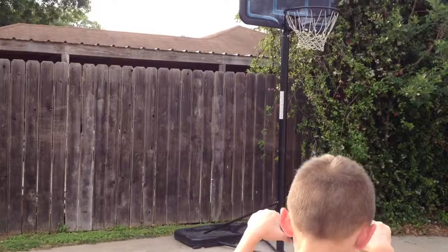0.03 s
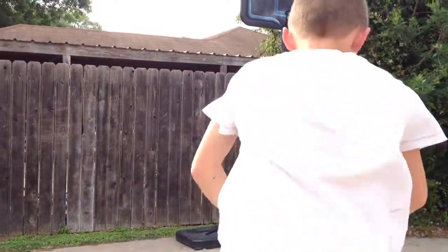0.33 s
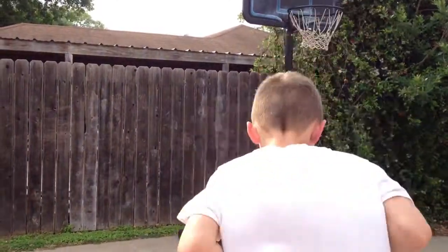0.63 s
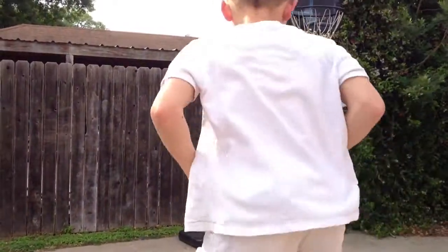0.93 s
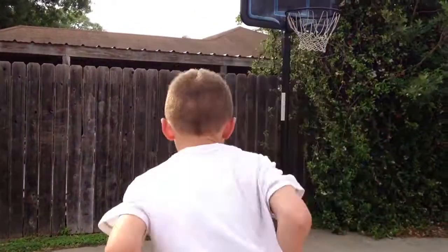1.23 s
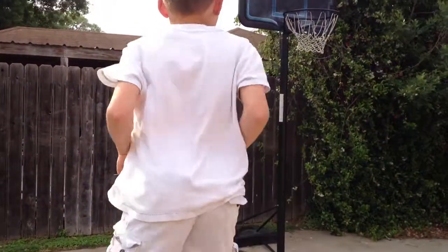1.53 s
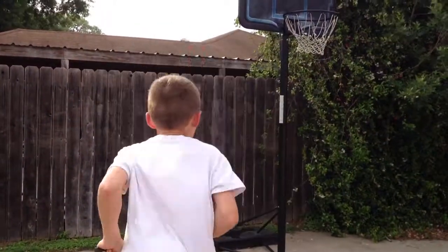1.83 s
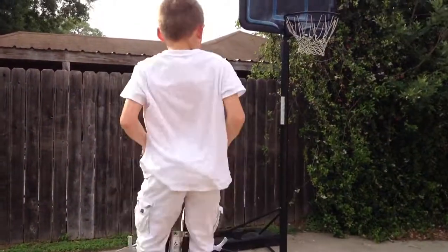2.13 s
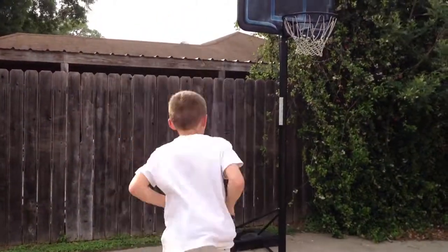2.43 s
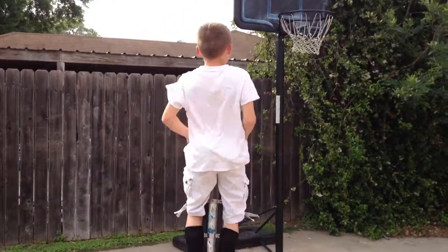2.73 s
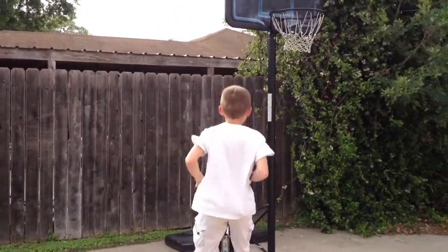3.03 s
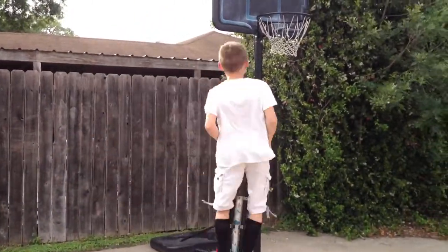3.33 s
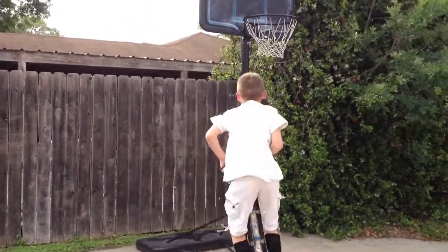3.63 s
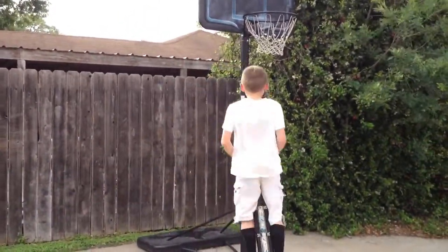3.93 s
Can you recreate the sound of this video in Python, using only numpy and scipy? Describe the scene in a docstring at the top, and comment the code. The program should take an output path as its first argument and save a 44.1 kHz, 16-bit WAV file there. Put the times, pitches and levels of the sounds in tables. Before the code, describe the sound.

Six pogo stick bounces, each a rattling landing and a sharp metallic clack, in a quiet yard.

```python
"""Pogo stick on a concrete drive

A child bounces away towards a wooden fence. At each landing the rubber foot thumps and spring and pegs
clatter; the shaft then slides out with friction and clacks against its stop at take-off. Hard impacts
excite the modes of the steel tube. The fence returns one echo and the yard a diffuse tail, while faint
outdoor air and a small bird lie behind."""
import sys
import numpy as np
from scipy import signal
from scipy.fft import rfft, irfft
from scipy.io import wavfile

SR = 44100
rng = np.random.default_rng(int(sys.argv[2]) if len(sys.argv) > 2 else 0)


def materialize(psi):
    """Save the field psi as 16-bit PCM at rate SR to the path in sys.argv[1].

    A 1-D psi becomes a single channel; in a 2-D psi each row is a channel.
    """
    bounded = np.clip(np.atleast_2d(psi).T, -1, 1)
    quanta = np.round(bounded * 32767).astype(np.int16)
    wavfile.write(sys.argv[1], SR, quanta)


N = 176400
TIME = np.arange(N) / SR
AGE = TIME[:SR // 3]  # seconds within one event

# Spectral envelopes of the noisy sources: frequency_hz, relative_density_db
AIR_SPECTRUM = [(25, -16), (60, -18), (110, -3.5), (160, 6), (210, 7.5), (350, 0), (600, -2.5),
                (1200, -1.5), (2200, -7.5), (4200, -6), (5300, -15.5), (7500, -9.5), (10500, -23),
                (15000, -29)]
SLIDE_SPECTRUM = [(200, -47), (1000, -7.5), (2400, -2.5), (3500, -1), (4500, 2), (5300, -11.5),
                  (7000, -3.5), (8700, -4.5), (10000, -15.5), (15000, -22.5)]
KNOCK_SPECTRUM = [(25, -65), (80, -58), (200, -17), (450, -6.5), (1000, -2), (2000, 1), (3200, 3.5),
                  (4500, 1), (5300, -5), (6800, 1), (8400, -6), (10000, -18), (15000, -30.5)]
THUMP_SPECTRUM = [(30, -22), (90, -25), (125, -13), (155, -4.5), (180, -7.5), (215, 2.5), (290, -9),
                  (400, -23), (900, -34.5), (3000, -23)]
RATTLE_SPECTRUM = [(60, -35), (200, -10), (450, -9.5), (1000, 3), (2000, 1.5), (3200, 4.5), (4500, 2),
                   (5300, -4.5), (6800, 0.5), (8500, -3), (10000, -20.5), (15000, -24)]
STOP_SPECTRUM = [(25, -40), (80, -43), (200, -4.5), (500, -9), (800, -5.5), (1400, -1.5), (2300, 2),
                 (3300, 0.5), (4700, 0), (5300, -6.5), (6600, -2.5), (8500, -5.5), (9600, -16),
                 (15000, -30.5)]
BASS_SHELF_HZ, TREBLE_SHELF_HZ, RESONANCE_HALF_WIDTH_HZ = 1300, 5200, 120

# Outdoor air: time_s, level_db
AIR_LEVELS = [(0, -51), (.55, -52.5), (.9, -50), (1.15, -58.5), (1.7, -52), (2.3, -55.5), (2.9, -54.5),
              (3.6, -54), (4, -50.5)]
# Bird chirps: start_s, length_s, start_hz, end_hz, level_db, rasp_hz
CHIRPS = [(2.945, 0.104, 4350, 4000, -51.5, 380), (3.227, .064, 3650, 3230, -44, 25),
          (3.793, 0.047, 3130, 2810, -44, 100)]

# Delay of the fence echo, shorter near the fence: time_s, delay_s
FENCE_DELAYS = [(.86, .028), (1.44, 0.034), (2.03, 0.029), (2.64, 0.019), (3.29, .018), (3.95, 0.02)]
# Reverberation of the yard: frequency_hz, level_db, t60_s
YARD_BANDS = [(147, -9.5, 0.66), (494, -3.5, 0.34), (1430, -9.5, 0.47), (4000, -7.5, .39), (7650, -6, 0.29),
              (14000, -3.5, 0.25)]
# Reverberant gain, tending to rise with distance: time_s, gain_db
YARD_GAINS = [(.6, -3), (1.5, 0.5), (2.1, -0.5), (2.7, 1.5), (4, 3)]
FENCE_DB, YARD_BUILD_S, YARD_GRAIN_DB, YARD_GRAIN_HZ = -15, 0.0047, 2.5, 390

# Modes of the steel tube: pitch_hz, level_db, t60_s
TUBE_MODES = [(1620, -45, .18), (2902, -44, .2), (3397, -44, .2), (4470, -31, .38), (7122, -46, .15),
              (8560, -42, .14)]
# The shaft slides out: peak_s, level_db, treble_db, squeak_db
SLIDES = [(.77, -46, -2.5, 12), (1.40, -46, -0.5, -13), (1.991, -47.5, 1.5, 9), (2.59, -51, 2, 2),
          (3.239, -49, 0.5, -7), (3.92, -45.5, -1.5, -15)]
SLIDE_WIDTH_S, SLIDE_ROUGH_DB, SLIDE_SQUEAK_HZ = 0.05, 2.5, 3680

# Loose parts strike the frame: start_s, level_db, treble_db, clunk_db
KNOCKS = [(.015, -38.5, -11, -29), (0.129, -43, 10, 0), (.214, -33.5, -9, 4), (0.508, -35.5, -1, 13.5),
          (.578, -32.5, -8, -4), (.5877, -11.5, 8, -31), (0.5901, -13, 4, -3), (0.6052, -21.5, 5, -10),
          (0.6353, -23.5, -5, 7), (1.196, -27, 4, 5), (1.203, -19, -6, 0), (1.2143, -15.5, 2.5, -9),
          (1.224, -24.5, 0, 0), (1.2337, -32, 18, 3), (1.4789, -21, 9, -12), (1.7910, -11.5, 0, 4),
          (1.7995, -16.5, 1, 7), (1.8073, -9.5, 4, -10), (1.8110, -8.5, -2, -2), (1.8352, -19, 18, 6),
          (2.0585, -15.5, 11.5, 14), (2.4033, -9, 2, 6), (2.4129, -9, 13, -2), (2.4214, -9.5, 10.5, -10),
          (2.4334, -43, 10, 3), (2.451, -18, 0, 11), (3.0414, -16.5, 5.5, 11), (3.046, -20, 5, 0),
          (3.0522, -18, 13, 14), (3.0582, -8.5, 7.5, 11.5), (3.7167, -32, -3, 17)]
KNOCK_CRACK_DB, KNOCK_TUBE_DB, CLUNK_HZ = -3.5, -19, 956

# The foot lands: start_s, thump_db, rattle_db, rattle_treble_db
LANDINGS = [(.584, -50, -32, 0.5), (1.193, -34, -34, -6), (1.788, -30.5, -27, 3), (2.401, -34, -27.5, -2.5),
            (3.039, -34, -33, -11), (3.713, -30.5, -29.5, -2.5)]
RATTLE_CLICKS_PER_S, RATTLE_SPREAD_DB = 1800, 3

# The shaft hits its stop: start_s, level_db, bass_db, treble_db, low_resonance_hz, low_lift_db,
# high_resonance_hz, high_lift_db, rebound_db, tube_db
STOP_IMPACTS = [(0.8573, -7, -1.5, -4.5, 2050, 7.5, 3240, 5.5, -32, -1),
                (1.4443, -11.5, 3, 0, 840, 4, 3340, 8, -3.5, -2),
                (2.0347, -8, 1.5, -0.5, 1750, 9.5, 4400, 7, -19, -17),
                (2.6409, -10.5, 4, 2, 1400, 11, 2440, 3, -8, -6),
                (3.2910, -11.5, 5, 3, 1845, 11, 3160, 1, -6.5, -11),
                (3.9495, -8.5, 1, 3, 1130, 5, 2340, 8, -7.5, 10)]
# Broad resonances common to every stop impact: centre_hz, lift_db
STOP_RESONANCES = [(1020, 3.5), (1700, 3), (2850, 3.5), (3700, 3.5), (4470, 5.5), (7200, 4), (8450, 3.5)]
STOP_CLACK_DB, STOP_TUBE_DB, REBOUND_S = -2.5, 3.5, 0.0074
SCATTERED_LIFT_SHARE = 0.51  # part of each resonance's dB lift left in sound sent round the yard


def from_db(db):
    """Amplitude ratio of a level in decibels."""
    return 10 ** (np.asarray(db) / 20)


def unit_power(x):
    """Normalisation to a mean square of one."""
    return x / np.sqrt(np.mean(x ** 2) + 1e-20)


def at_hz(table, hz, column=1):
    """Interpolation on a logarithmic frequency axis."""
    table = np.array(table)
    return np.interp(np.log(hz + 1), np.log(table[:, 0]), table[:, column])


def add(out, start_s, x):
    """Superposition of a sound from a given time."""
    i = max(int(start_s * SR), 0)
    out[i:i + len(x)] += x[:max(N - i, 0)]


def white_noise():
    """Gaussian noise with a flat spectrum, one event long."""
    return rng.standard_normal(len(AGE))


def drift(corner_hz):
    """Random fluctuation of unit power: noise through a two-pole low-pass."""
    pole = np.exp(-2 * np.pi * corner_hz / SR)
    smooth = signal.lfilter([1], [1, -2 * pole, pole * pole], rng.standard_normal(N + SR))
    return unit_power(smooth[SR:])


def coloured(x, spectrum, bass_db=0, treble_db=0, resonances=()):
    """Minimum-phase filter of unit power gain: a spectral envelope, two shelves and resonance peaks."""
    size = len(x)
    hz = np.arange(size // 2 + 1) * SR / size
    db = at_hz(spectrum, hz) + bass_db / (1 + (hz / BASS_SHELF_HZ) ** 4)
    db += treble_db * (1 - 1 / (1 + (hz / TREBLE_SHELF_HZ) ** 8))
    for centre_hz, lift_db in resonances:
        db += lift_db / (1 + ((hz - centre_hz) / RESONANCE_HALF_WIDTH_HZ) ** 2)
    cepstrum = irfft(np.log(unit_power(from_db(db))), size)
    cepstrum[1:size // 2] *= 2  # folding the cepstrum makes the filter causal
    cepstrum[size // 2 + 1:] = 0
    return irfft(rfft(x) * np.exp(rfft(cepstrum)), size)


def burst(noise, hold_s, t60_s, whitening=0.4):
    """Impact excitation: partly whitened noise that holds, then decays; its envelope sets its energy."""
    envelope = from_db(-60 * np.maximum(AGE - hold_s, 0) / t60_s)
    spectrum = rfft(noise * envelope)
    whitened = irfft(spectrum / (abs(spectrum) + 1e-9) ** whitening, len(AGE))
    return unit_power(whitened * (AGE < hold_s + t60_s)) * np.sqrt(np.mean(envelope ** 2))


def outdoor_air():
    """Ambient noise: distant rumble and leaf hiss form a broad spectrum of slowly varying level."""
    level_db = np.interp(TIME, *np.transpose(AIR_LEVELS)) + 0.27 * drift(corner_hz=3.1)
    return from_db(level_db) * coloured(rng.standard_normal(N), AIR_SPECTRUM)


def bird():
    """Frequency modulation: thin whistles glide downward, and random pitch deviation adds rasp."""
    out = np.zeros(N)
    for start_s, length_s, start_hz, end_hz, level_db, rasp_hz in CHIRPS:
        size = int(length_s * SR)
        pitch_hz = np.linspace(start_hz, end_hz, size) + rasp_hz * drift(corner_hz=190)[:size]
        envelope = from_db(level_db) * np.sin(np.linspace(0, np.pi, size))
        add(out, start_s, envelope * np.sin(2 * np.pi * np.cumsum(pitch_hz) / SR))
    return out


def fence_echo(x):
    """Specular reflection: one weaker copy, delayed by its extra path as the child moves."""
    delay_s = np.interp(TIME, *np.transpose(FENCE_DELAYS))
    return from_db(FENCE_DB) * np.interp(TIME - delay_s, TIME, x)


def yard_reverberation(x):
    """Diffuse scattering: many echoes merge into a grainy tail, each band decaying at its own rate."""
    age, tail = TIME[:SR], 0
    grain = from_db(YARD_GRAIN_DB * drift(YARD_GRAIN_HZ)[:SR])
    build_up = 1 - np.exp(-age / YARD_BUILD_S)
    edges_hz = np.geomspace(60, 17000, 13)
    for low_hz, high_hz in zip(edges_hz, edges_hz[1:]):
        centre_hz = np.sqrt(low_hz * high_hz)
        band_pass = signal.butter(2, [low_hz, high_hz], "band", fs=SR, output="sos")
        band = signal.sosfilt(band_pass, grain * rng.standard_normal(SR))
        decay = from_db(-60 * age / at_hz(YARD_BANDS, centre_hz, column=2))
        gain = from_db(at_hz(YARD_BANDS, centre_hz)) * np.sqrt(2 * (high_hz - low_hz)) / SR
        tail += gain * unit_power(band * decay * build_up)
    distance_gain = from_db(np.interp(TIME, *np.transpose(YARD_GAINS)))
    return signal.fftconvolve(x * distance_gain, tail)[:N]


def tube_ring():
    """Free vibration: a blow excites the tube's damped modes with random strengths and phases."""
    ring = np.zeros(len(AGE))
    for pitch_hz, level_db, t60_s in TUBE_MODES:
        envelope = rng.uniform(0.75, 1) * from_db(level_db - 60 * AGE / t60_s)
        ring += envelope * np.sin(2 * np.pi * (pitch_hz * AGE + rng.random()))
    return ring


def shaft_slides():
    """Sliding friction: the spring pushes the shaft through its bushing, and a rough hiss swells."""
    out, middle_s = np.zeros(N), AGE.mean()
    swell = np.exp(-0.5 * ((AGE - middle_s) / SLIDE_WIDTH_S) ** 2)
    for peak_s, level_db, treble_db, squeak_db in SLIDES:
        friction = white_noise() * from_db(SLIDE_ROUGH_DB * drift(corner_hz=95)[:len(AGE)])
        squeak = [(SLIDE_SQUEAK_HZ, squeak_db)]
        rub = coloured(unit_power(friction), SLIDE_SPECTRUM, treble_db=treble_db, resonances=squeak)
        add(out, peak_s - middle_s, from_db(level_db) * swell * rub)
    return out


def frame_knocks():
    """Brief contact gives a wide spectrum: spring and pegs crack on the frame, some with a clunk."""
    out = np.zeros(N)
    for start_s, level_db, treble_db, clunk_db in KNOCKS:
        contact = burst(white_noise(), hold_s=0.0017, t60_s=0.021)
        crack = coloured(contact, KNOCK_SPECTRUM, treble_db=treble_db, resonances=[(CLUNK_HZ, clunk_db)])
        knock = from_db(KNOCK_CRACK_DB) * crack + from_db(KNOCK_TUBE_DB) * tube_ring()
        add(out, start_s, from_db(level_db) * knock)
    return out


def landings():
    """Soft contact favours low frequencies: the rubber foot thumps as the spring chatters in its tube."""
    out = np.zeros(N)
    for start_s, thump_db, rattle_db, treble_db in LANDINGS:
        contact = burst(white_noise(), hold_s=0.018, t60_s=0.15)
        add(out, start_s, from_db(thump_db) * coloured(contact, THUMP_SPECTRUM))
        strengths = np.sign(white_noise()) * from_db(RATTLE_SPREAD_DB * white_noise())
        clicks = strengths * (rng.random(len(AGE)) < RATTLE_CLICKS_PER_S / SR)
        chatter = burst(clicks, hold_s=0.038, t60_s=0.14)
        add(out, start_s, from_db(rattle_db) * coloured(chatter, RATTLE_SPECTRUM, treble_db=treble_db))
    return out


def stop_clacks(lift_share):
    """Impact with rebound: at take-off the shaft strikes its stop twice, and each blow rings the tube."""
    out = np.zeros(N)
    for (start_s, level_db, bass_db, treble_db,
         low_hz, low_lift_db, high_hz, high_lift_db, rebound_db, tube_db) in STOP_IMPACTS:
        peaks = STOP_RESONANCES + [(low_hz, low_lift_db), (high_hz, high_lift_db)]
        resonances = [(hz, lift_share * lift_db) for hz, lift_db in peaks]
        for delay_s, blow_db in ((0, level_db), (REBOUND_S, level_db + rebound_db)):
            contact = burst(white_noise(), hold_s=0.0022, t60_s=0.019)
            clack = coloured(contact, STOP_SPECTRUM, bass_db, treble_db, resonances)
            blow = from_db(STOP_CLACK_DB) * clack + from_db(STOP_TUBE_DB + tube_db) * tube_ring()
            add(out, start_s + delay_s, from_db(blow_db) * blow)
    return out


def scene():
    """Direct and reflected sound superpose; each bounce is on a new spot, so it scatters differently."""
    clatter = landings() + frame_knocks() + shaft_slides()
    direct = clatter + stop_clacks(lift_share=1)
    scattered = clatter + stop_clacks(SCATTERED_LIFT_SHARE)
    landing_times_s = [row[0] for row in LANDINGS]
    bounce_index = np.searchsorted(landing_times_s[1:], TIME + 0.01)  # steps just before a landing
    bounces = [scattered * (bounce_index == k) for k in range(len(LANDINGS))]
    reflections = sum(fence_echo(bounce) + yard_reverberation(bounce) for bounce in bounces)
    return (direct + reflections + bird() + outdoor_air())[None]


def record(dry):
    """Soft saturation rounds the loudest peaks; band limiting removes the deep bass and the top."""
    ceiling, low_cut_hz, high_cut_hz = 0.71, 72, 15400
    rounded = ceiling * np.tanh(dry / ceiling)
    high_pass = signal.butter(2, low_cut_hz, "high", fs=SR, output="sos")
    low_pass = signal.ellip(10, 0.1, 70, high_cut_hz, fs=SR, output="sos")
    return signal.sosfilt(low_pass, signal.sosfilt(high_pass, rounded))


dry = scene()
out = record(dry)
materialize(out)
```